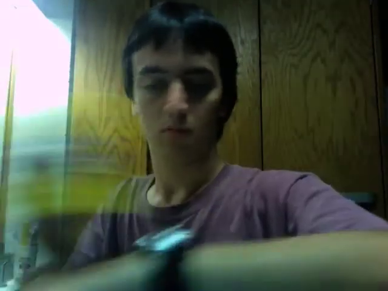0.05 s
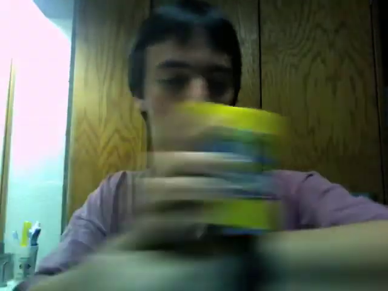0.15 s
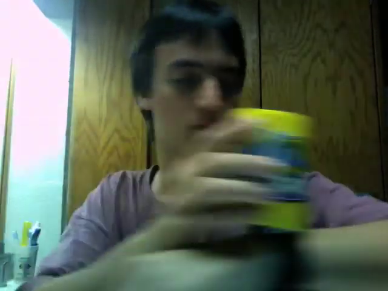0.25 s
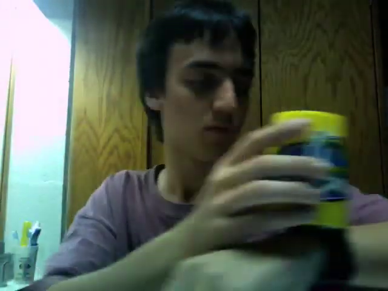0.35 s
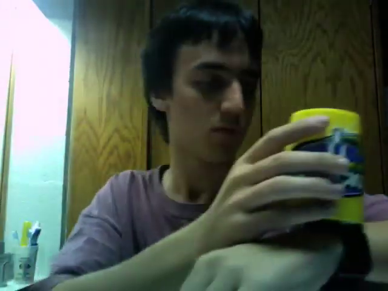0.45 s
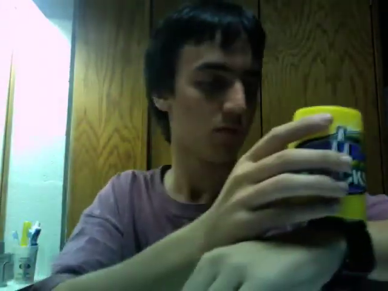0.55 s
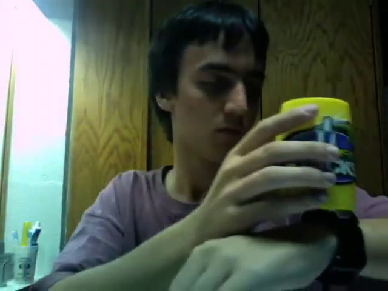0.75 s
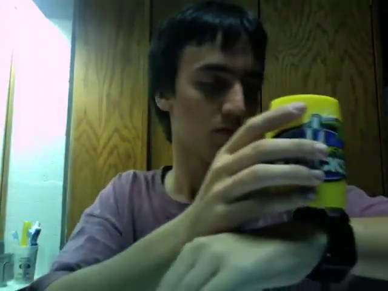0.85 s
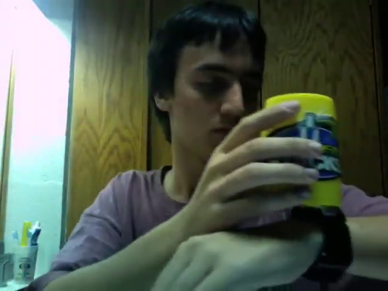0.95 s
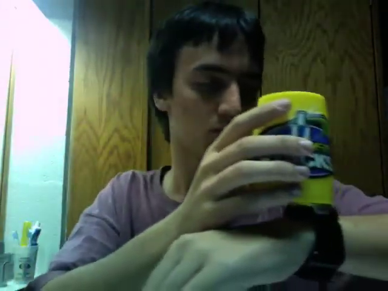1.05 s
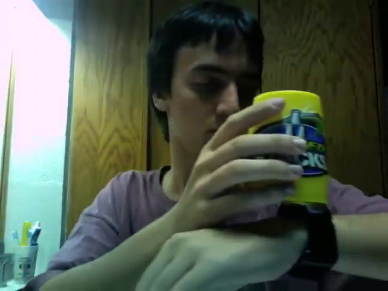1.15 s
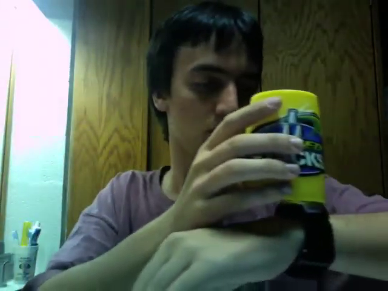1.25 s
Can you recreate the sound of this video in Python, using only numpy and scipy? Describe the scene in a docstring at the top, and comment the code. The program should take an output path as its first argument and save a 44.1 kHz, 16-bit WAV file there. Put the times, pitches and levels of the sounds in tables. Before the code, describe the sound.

One sharp, hollow knock of a plastic tub, then a short slide and faint ticks.

```python
"""A small room, close up: a plastic tub is swung onto a wrist with a watch.
Over a faint hum the arm rustles and the tub scrapes in, both as noise made of tiny slips.
The landing thumps the base and rings a hollow note that sinks as the tub seats; hard contacts
clack on the thin wall. The tub slides to rest, fingers rub the rim and light taps ping it.
The room answers the hollow note, the clacks and the ticks with a diffuse tail."""
import sys
import numpy as np
from scipy import signal
from scipy.fft import rfft, irfft, next_fast_len
from scipy.io import wavfile
from scipy.ndimage import map_coordinates

SR = 44100
rng = np.random.default_rng(int(sys.argv[2]) if len(sys.argv) > 2 else 0)


def put_to_file(sound):
    """Save the sound as 16-bit audio at rate SR, in the file named by the first command-line argument."""
    columns = np.atleast_2d(sound).T  # one column per channel
    safe = np.clip(columns, -1, 1)
    whole_steps = np.round(safe * 32767)
    wavfile.write(sys.argv[1], SR, whole_steps.astype(np.int16))


N = 57330

# Room decay. Each row: frequency in Hz, t60 in seconds.
ROOM_DECAY = [(200, 0.1), (800, 0.51), (2500, 0.21), (7000, 0.14), (14000, .17)]
# Room rumble and hiss. Each row: frequency in Hz, relative gain in dB.
FLOOR_SPECTRUM = [(15, -33.5), (25, 5), (55, -1), (82, -8), (107, -4), (209, -10), (482, -14), (523, -12.5),
                  (631, -12.5), (2300, -28.5), (15500, -40.5)]
# Mains hum. Each row: frequency in Hz, rms level in dB.
HUM_TONES = [(120, -69.5)]
# Faint short tone. One row: centre in seconds, pitch in Hz, level in dB, width in seconds.
FAINT_TONE = (.09, 565, -56, .025)
# Sleeve rustle. Each row: frequency in Hz, relative gain in dB.
SLEEVE_SPECTRUM = [(200, -10), (900, 3.5), (2000, -8), (6000, -12), (15000, -25)]
# Finger rubs on the rim. Each row: centre in seconds, level in dB, width in seconds.
RUBS = [(0.693, -65.5, 0.019), (0.735, -63, 0.022)]
# Finger friction. Each row: frequency in Hz, relative gain in dB.
RUB_SPECTRUM = [(600, -18), (950, -6), (1700, -16), (2550, 1.5), (4000, -16), (5250, 3.5), (6600, -19),
                (8400, -5.5), (10000, -12.5), (15000, -23.5)]
# Scrape on the way in. Each row: time in seconds, level in dB.
SCRAPE_ENVELOPE = [(.135, -87), (.16, -56.5), (.18, -51), (.2, -43.5), (.225, -39.5), (.245, -30.5),
                   (.262, -31.5), (.28, -47.5)]
# Scrape friction. Each row: frequency in Hz, relative gain in dB.
SCRAPE_SPECTRUM = [(200, -18), (420, -8), (850, 1.5), (1300, -10.5), (1650, -3), (2200, -12.5), (2700, -4),
                   (3450, -4.5), (4300, -20.5), (5200, -9), (7600, -14), (9500, -11.5), (15500, -22.5)]
# Slide to rest. Each row: time in seconds, level in dB.
SLIDE_ENVELOPE = [(.26, -96.5), (.28, -29.5), (.31, -39), (.35, -47), (.4, -57.5), (.45, -64.5), (.52, -89),
                  (.6, -110)]
# Slide friction. Each row: frequency in Hz, relative gain in dB.
SLIDE_SPECTRUM = [(710, -40), (1200, -11.5), (1600, 3), (1980, -12.5), (2480, 3.5), (2710, -3.5),
                  (3810, -7.5), (5310, -1.5), (5730, -1.5), (11400, -16), (15500, -34.5)]
# Settling taps. Each row: start in seconds, rim level in dB, edge level in dB.
TICKS = [(.4125, -53, -63), (0.4161, -40, -40.5), (0.4489, -53.5, -66), (0.5453, -43.5, -59),
         (0.5471, -45, -47.5), (.556, -57, -62), (0.7094, -62, -70), (0.7243, -48.5, -70),
         (0.7335, -61.5, -62.5), (0.8429, -60, -65.5), (1.1908, -64, -63)]
# Rim modes. Each row: frequency in Hz, relative level in dB, t60 in seconds.
RIM_MODES = [(2459, 0, 0.021), (2733, -4.5, 0.017), (4880, -3, 0.013), (5290, -1.5, 0.0092),
             (7800, -3.5, 0.0099)]
# Bright edge of a tap. Each row: frequency in Hz, relative gain in dB.
EDGE_SPECTRUM = [(400, 1.5), (1000, 5.5), (4000, -6), (8000, -2.5), (11000, -2.5), (14000, -3.5),
                 (16000, -10.5)]
# Hard contacts on the wall. Each row: start in seconds, level in dB, hold in seconds.
CLACKS = [(0.247, -26, 0.0014), (0.2721, -15.5, 0.0012), (0.2741, -13, .0031)]
# Wall resonances. Each row: frequency in Hz, relative gain in dB.
WALL_MODES = [(2480, -5), (2970, -2.5), (3420, -6), (5170, 1.5), (5740, 2), (6210, -6.5), (6700, -11.5),
              (7750, -7), (8460, -1.5), (8900, -7), (10600, -6), (11500, -6), (14300, -13)]
# Crack of a hard contact. Each row: frequency in Hz, relative gain in dB.
CRACK_SPECTRUM = [(300, -19), (1500, -11.5), (2500, -10.5), (4200, -9), (5500, -6), (9000, -1.5),
                  (12000, -8), (16000, -18.5)]
# Base giving under the landing. Each row: level in dB, pitch in Hz, length in seconds.
THUMP_PULSES = [(-6, 818, 0.00318), (-19, 470, 0.0062)]
# Blows that ring the hollow note.
# Each row: start in seconds, level in dB, pitch in Hz, rise in seconds, t60 in seconds.
HOLLOW_BLOWS = [(.2487, -12, 788, 0.0018, 0.043), (.2655, -9.5, 770.3, .004, 0.061),
                (.2835, -14.5, 748, 0.0038, 0.079), (.346, -33, 849, .002, 0.028),
                (.386, -35.5, 743.6, 0.01, 0.095), (.4168, -30.5, 730.4, .0006, 0.052),
                (.5468, -37.5, 718.5, 0.00037, 0.071), (.7355, -52, 901, 0.00033, 0.053)]
# Hollow tub modes. Each row: multiple of the pitch, relative level in dB, share of the blow's t60.
HOLLOW_MODES = [(1, 1, 1), (.56, -21, .9), (1.3, -16.5, 0.65), (2.12, -16, 0.74)]

FLOOR_DB, TOP_HZ = -58, 15780
SLEEVE_DB, SLEEVE_T60_S = -54.5, 0.12
EDGE_HOLD_S, EDGE_T60_S, EDGE_WET_DB = 0.0012, 0.003, -7
RIM_RISE_S, RIM_WET_DB = 0.00029, -11.5
GRIP_DETUNE = 0.022  # fingers shift the rim modes from tap to tap
CLACK_T60_S, CLACK_WET_DB, CRACK_DB, WALL_WIDTH_HZ = 0.0048, -11, -8.5, 220
EARLY_WET_DB, EARLY_T60_S = -13.5, 0.02
LANDING_S, BASS_CUT_HZ = 0.2452, 330
HOLLOW_WET_DB, HOLLOW_ROOM_T60_S = -12.5, 0.29

TIME_S = np.arange(N) / SR
FFT_SIZE = 2 * next_fast_len(N)
FREQ_HZ = np.fft.rfftfreq(FFT_SIZE, 1 / SR)


def amp(db):
    """Decibels to gain."""
    return 10 ** (np.asarray(db) / 20)


def log_interp(points, hz):
    """Interpolate (Hz, value) points on a log frequency axis."""
    knots_hz, values = np.transpose(points)
    return np.interp(np.log(hz + 1), np.log(knots_hz + 1), values)


def filtered(x, response):
    """Filter x, scaled so that white noise keeps its power."""
    rms_gain = np.sqrt(np.mean(abs(response) ** 2))
    return irfft(rfft(x, FFT_SIZE) * response / rms_gain, FFT_SIZE)[:N]


def coloured(x, spectrum):
    """Minimum-phase filter shaped by (Hz, dB) points."""
    cepstrum = irfft(np.log(amp(log_interp(spectrum, FREQ_HZ))))
    cepstrum[1:FFT_SIZE // 2] *= 2
    cepstrum[FFT_SIZE // 2 + 1:] = 0
    return filtered(x, np.exp(rfft(cepstrum)))


def contact(start_s, hold_s, t60_s):
    """Chattering contact force: holds, then dies."""
    t = TIME_S - start_s
    envelope = (t >= 0) * amp(-60 * np.maximum(t - hold_s, 0) / t60_s)
    return envelope * np.sign(rng.standard_normal(N))


def friction(spectrum, grain_db, slip_rate_hz=900):
    """Coloured noise of tiny, uneven slips."""
    slips = map_coordinates(rng.standard_normal(N), [TIME_S * slip_rate_hz])
    noise = rng.standard_normal(N) * amp(grain_db * slips)
    return coloured(noise / np.sqrt(np.mean(noise ** 2)), spectrum)


def reverb(x, wet_db, decay, delay_s=0.005):
    """Diffuse room answer: a noise tail dying by (Hz, t60 in seconds) points."""
    hz, t, bands = signal.stft(rng.standard_normal(SR // 2), SR, nperseg=256)
    fade = amp(-60 * t / log_interp(decay, hz)[:, None])
    _, tail = signal.istft(bands * fade, SR, nperseg=256)
    tail *= np.arange(len(tail)) / SR > delay_s
    return amp(wet_db) * signal.fftconvolve(x, tail / np.linalg.norm(tail))[:N]


def background():
    """Room rumble, hiss, mains hum and one faint short tone."""
    hum = sum(amp(db) * np.sqrt(2) * np.sin(2 * np.pi * (hz * TIME_S + rng.random()))
              for hz, db in HUM_TONES)
    centre_s, hz, db, width_s = FAINT_TONE
    tone = amp(db) * np.exp(-((TIME_S - centre_s) / width_s) ** 2) * np.sin(2 * np.pi * hz * TIME_S)
    return amp(FLOOR_DB) * coloured(rng.standard_normal(N), FLOOR_SPECTRUM) + hum + tone


def sleeve():
    """Rustle of the arm's first movement, dying away."""
    return amp(SLEEVE_DB - 60 * TIME_S / SLEEVE_T60_S) * friction(SLEEVE_SPECTRUM, grain_db=1.5)


def finger_rubs():
    """Fingers shift on the rim in short swells of friction."""
    envelope = sum(amp(db) * np.exp(-((TIME_S - centre_s) / width_s) ** 2)
                   for centre_s, db, width_s in RUBS)
    return envelope * friction(RUB_SPECTRUM, grain_db=2.0)


def tub_scrape(envelope, spectrum, grain_db):
    """Friction of the moving tub."""
    level_db = np.interp(TIME_S, *np.transpose(envelope), left=-120, right=-120)
    return amp(level_db) * friction(spectrum, grain_db)


def rim_ticks():
    """Light taps ping the rim; contact chatter adds a bright edge."""
    rim = np.zeros(N)
    for start_s, rim_db, _ in TICKS:
        t = np.maximum(TIME_S - start_s, 0)
        attack = 1 - np.exp(-t / RIM_RISE_S)
        for hz, mode_db, t60_s in RIM_MODES:
            pitch_hz = hz * (1 + GRIP_DETUNE * rng.standard_normal())
            envelope = attack * amp(rim_db + mode_db - 60 * t / t60_s)
            rim += envelope * np.sin(2 * np.pi * (pitch_hz * t + rng.random()))
    force = sum(amp(db) * contact(start_s, EDGE_HOLD_S, EDGE_T60_S) for start_s, _, db in TICKS)
    edge = coloured(force, EDGE_SPECTRUM)
    return rim + edge + reverb(rim, RIM_WET_DB, ROOM_DECAY) + reverb(edge, EDGE_WET_DB, ROOM_DECAY)


def wall_clacks():
    """Hard contacts crack and ring the thin wall; early reflections and a room tail follow."""
    def force():
        return sum(amp(db) * contact(start_s, hold_s, CLACK_T60_S) for start_s, db, hold_s in CLACKS)

    damping = 1j * FREQ_HZ * WALL_WIDTH_HZ
    wall = sum((-1) ** k * amp(db) * damping / (hz ** 2 - FREQ_HZ ** 2 + damping)
               for k, (hz, db) in enumerate(WALL_MODES))
    ring = filtered(force(), wall)
    crack = amp(CRACK_DB) * coloured(force(), CRACK_SPECTRUM)
    impulses = np.zeros(N)  # one per contact, to drive the room
    for start_s, db, hold_s in CLACKS:
        impulses[round(start_s * SR)] += amp(db) * np.sqrt(hold_s * SR)
    snap = coloured(impulses, CRACK_SPECTRUM)
    early = reverb(snap, EARLY_WET_DB, [(1000, EARLY_T60_S)])
    return ring + crack + early + reverb(snap, CLACK_WET_DB, ROOM_DECAY)


def base_thump():
    """The base gives under the soft landing: tones in half-sine windows."""
    t = np.maximum(TIME_S - LANDING_S, 0)
    return sum(amp(db) * np.sin(np.pi * np.minimum(t / length_s, 1)) * np.sin(2 * np.pi * hz * t)
               for db, hz, length_s in THUMP_PULSES)


def hollow_tub():
    """The base thumps and each blow rings the hollow note; the low end is cut away."""
    tub = base_thump()
    for start_s, db, hz, rise_s, t60_s in HOLLOW_BLOWS:
        t = np.maximum(TIME_S - start_s, 0)
        ring = sum(amp(mode_db - 60 * t / (t60_s * share)) * np.sin(2 * np.pi * hz * ratio * t)
                   for ratio, mode_db, share in HOLLOW_MODES)
        tub += amp(db) * (1 - np.exp(-t / rise_s)) * ring
    bass_cut = signal.butter(2, BASS_CUT_HZ, 'high', fs=SR, output='sos')
    thinned = signal.sosfilt(bass_cut, tub)
    return thinned + reverb(thinned, HOLLOW_WET_DB, [(800, HOLLOW_ROOM_T60_S)])


def scene():
    """Mono sum of all sources."""
    impacts = hollow_tub() + wall_clacks() + rim_ticks()
    scrape_in = tub_scrape(SCRAPE_ENVELOPE, SCRAPE_SPECTRUM, grain_db=0.6)
    slide = tub_scrape(SLIDE_ENVELOPE, SLIDE_SPECTRUM, grain_db=0.5)
    return (impacts + scrape_in + slide + finger_rubs() + sleeve() + background())[None]


def record(dry):
    """Brick-wall low-pass at TOP_HZ."""
    return irfft(rfft(dry, FFT_SIZE) * (FREQ_HZ < TOP_HZ), FFT_SIZE)[:, :N]


dry = scene()
out = record(dry)
put_to_file(out)
```